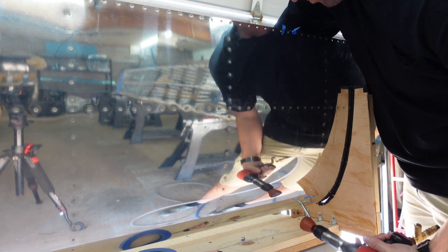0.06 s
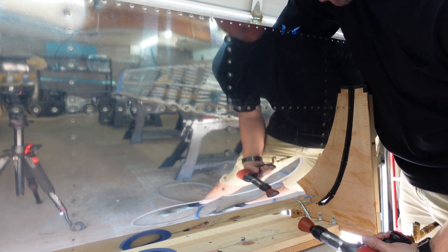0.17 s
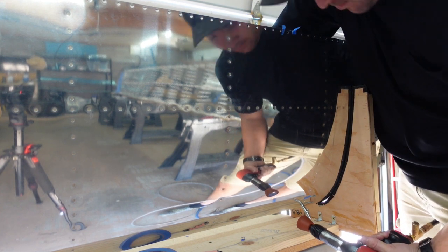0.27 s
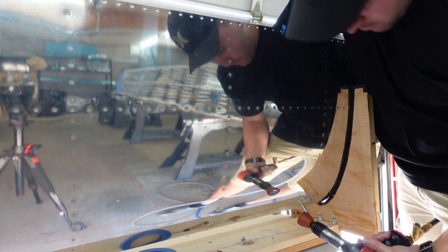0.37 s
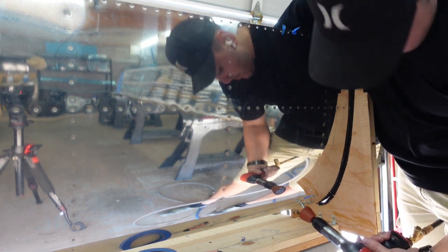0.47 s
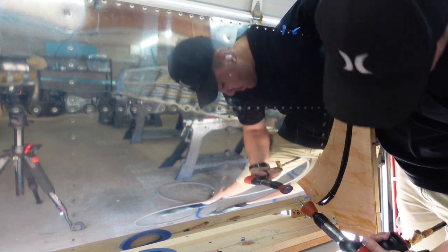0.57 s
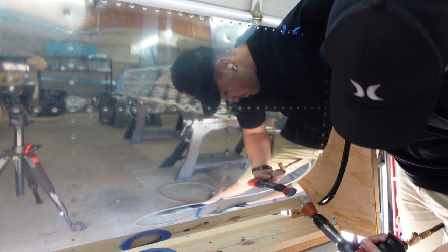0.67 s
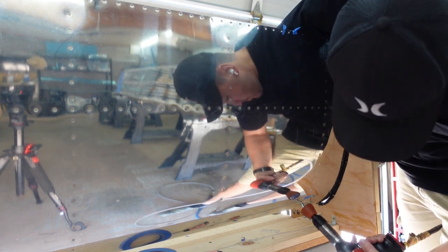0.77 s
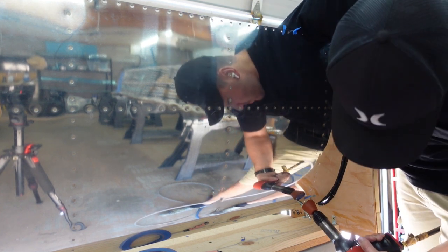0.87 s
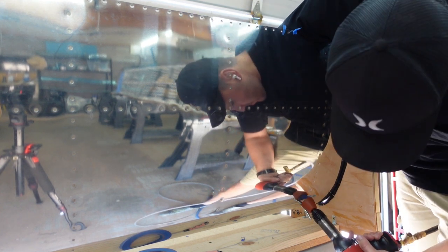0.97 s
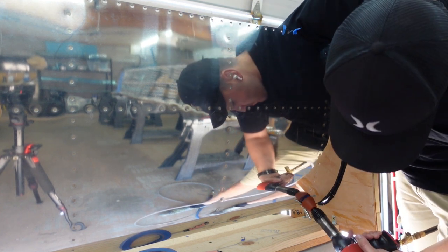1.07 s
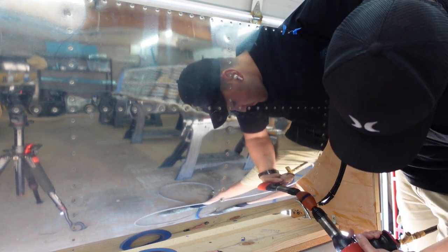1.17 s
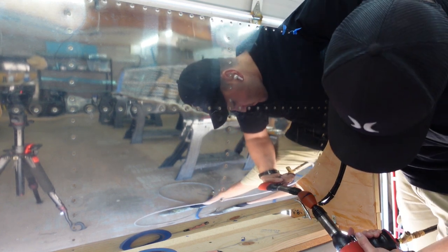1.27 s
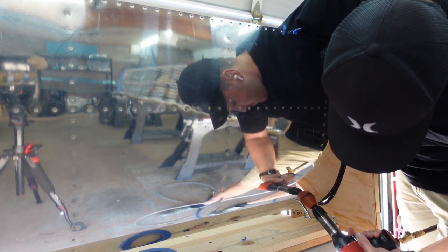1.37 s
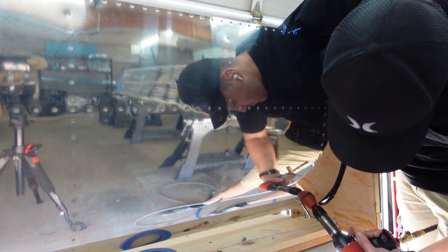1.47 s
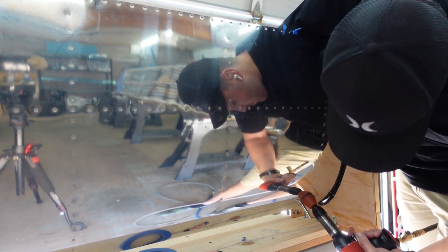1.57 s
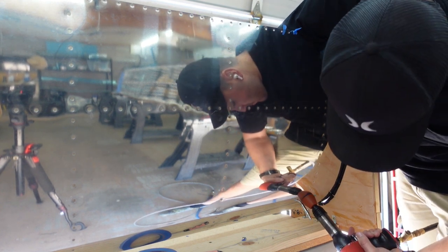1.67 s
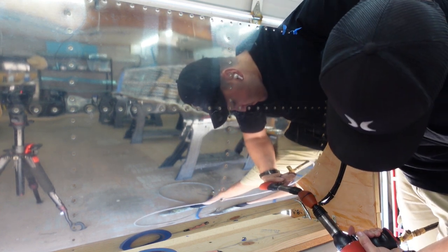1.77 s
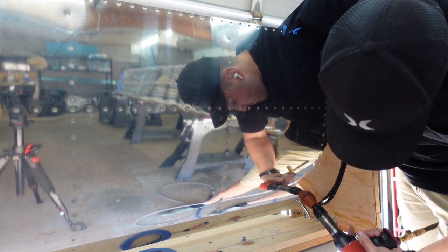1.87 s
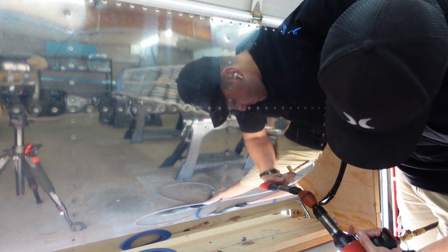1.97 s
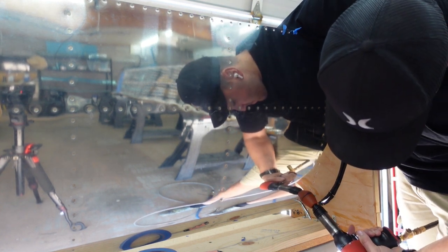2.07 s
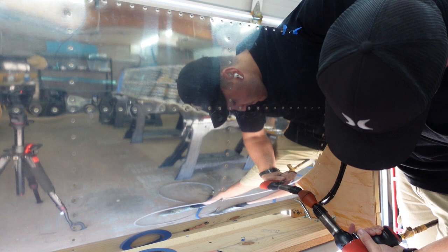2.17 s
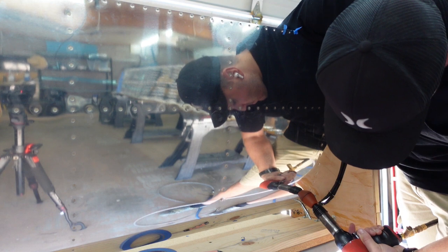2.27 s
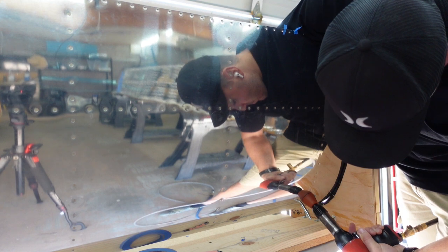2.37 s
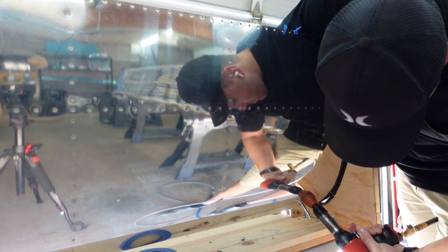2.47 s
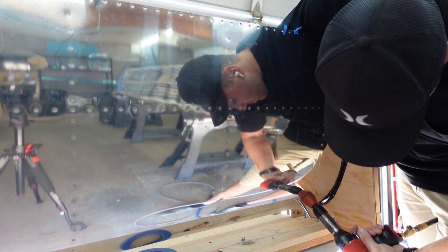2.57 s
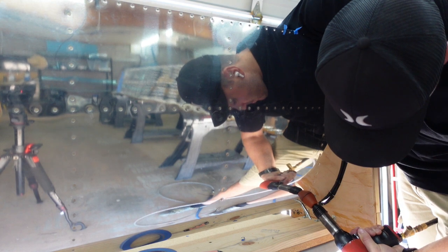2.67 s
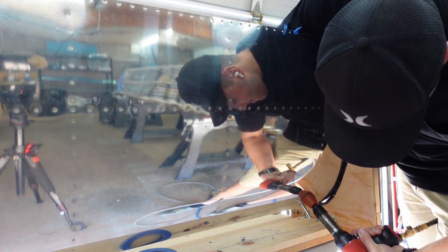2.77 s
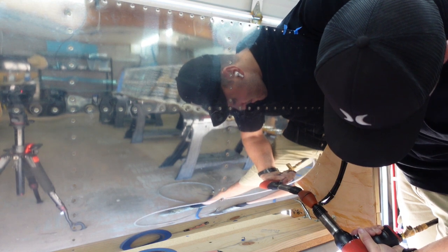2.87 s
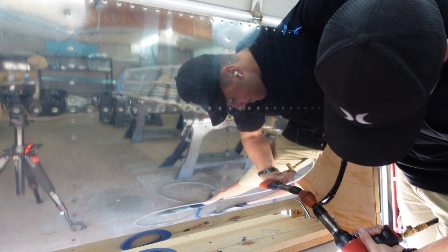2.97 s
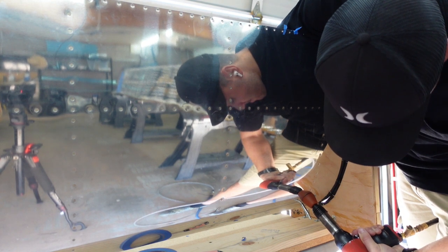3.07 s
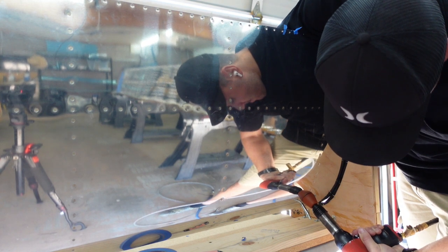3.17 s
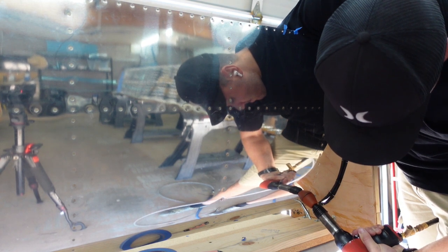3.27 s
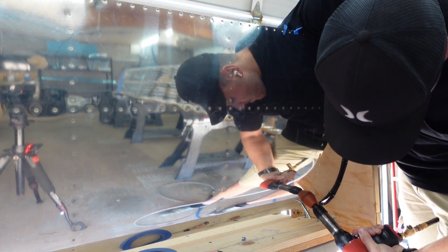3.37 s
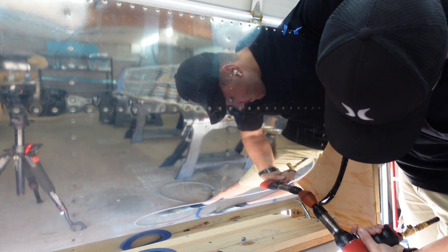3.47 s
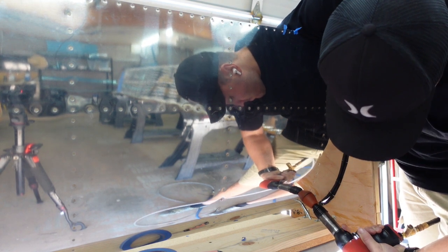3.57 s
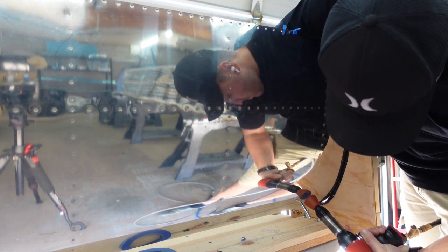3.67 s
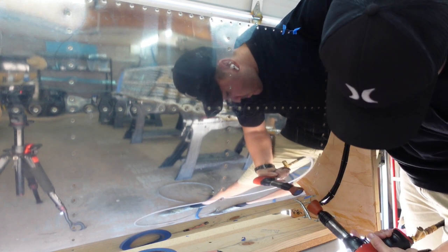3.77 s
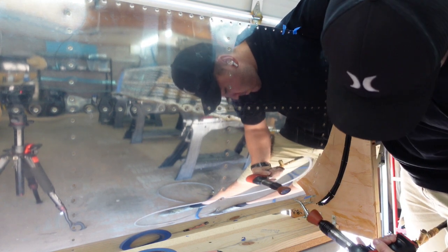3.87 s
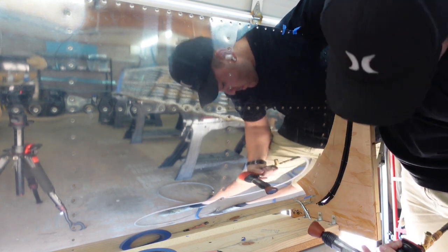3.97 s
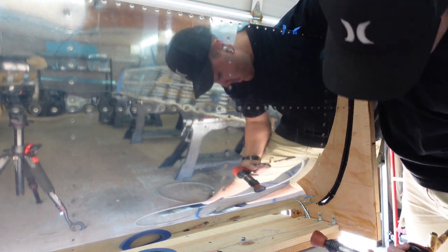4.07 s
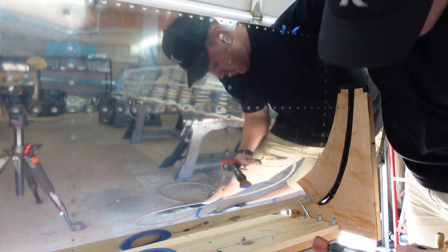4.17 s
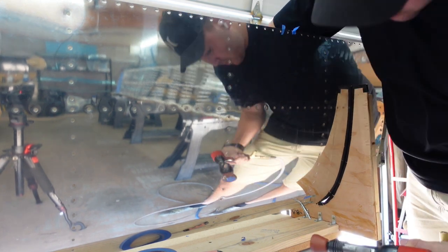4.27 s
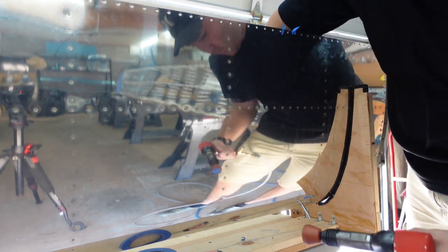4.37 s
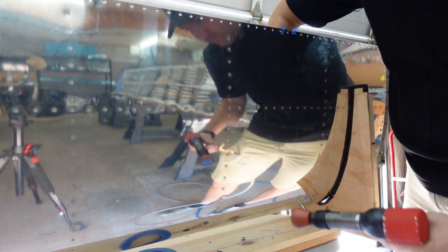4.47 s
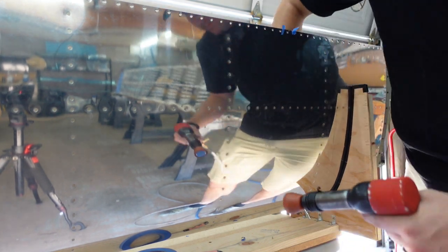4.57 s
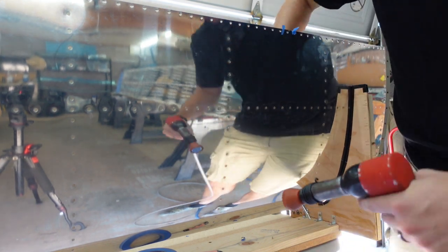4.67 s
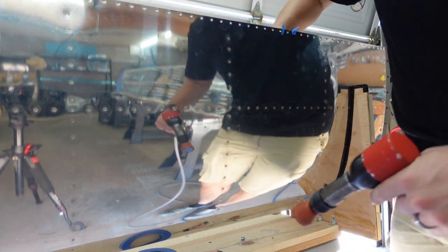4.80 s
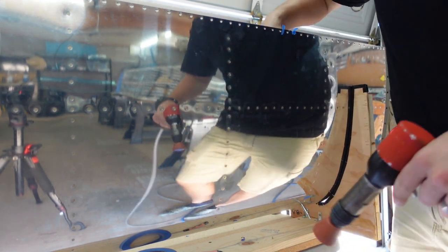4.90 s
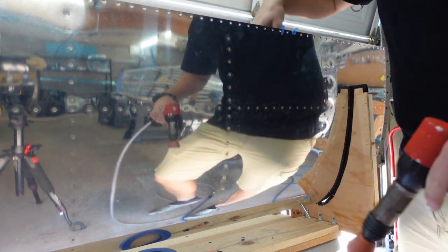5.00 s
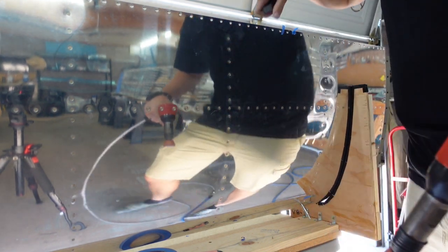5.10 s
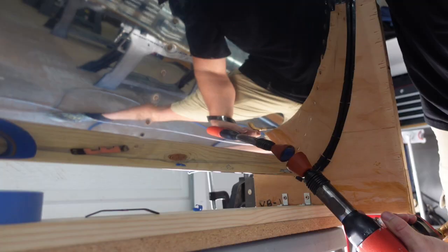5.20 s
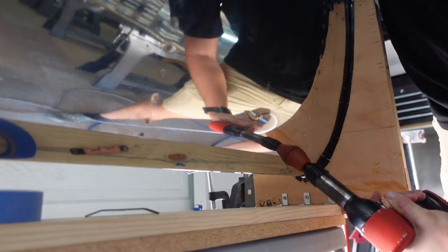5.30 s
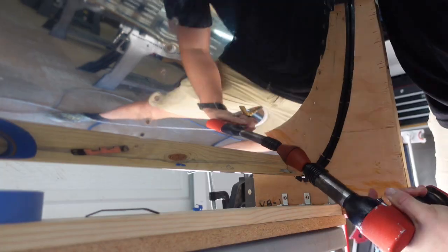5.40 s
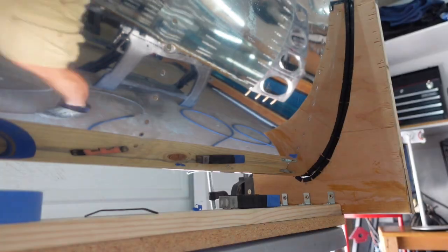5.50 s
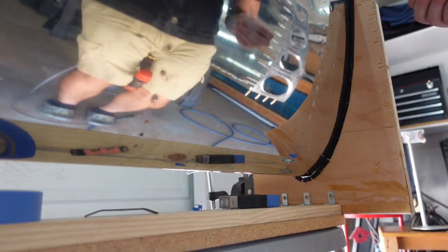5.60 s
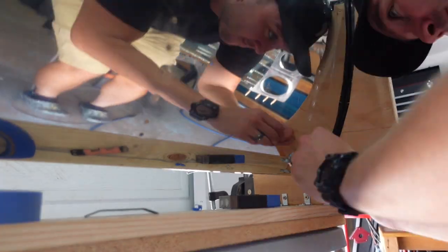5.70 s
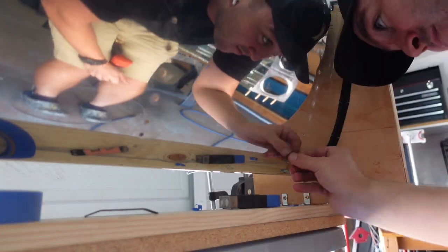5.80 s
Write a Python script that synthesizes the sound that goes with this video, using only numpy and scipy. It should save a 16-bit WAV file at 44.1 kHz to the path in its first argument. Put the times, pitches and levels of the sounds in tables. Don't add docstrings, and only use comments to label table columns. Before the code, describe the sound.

Steady workshop ventilation roar, a few tool ticks, then one rapid hammering burst from an air rivet gun on ringing sheet metal, ending in a low boom.

```python
import sys
import numpy as np
from scipy import signal
from scipy.io import wavfile

SR = 44100
rng = np.random.default_rng(int(sys.argv[2]) if len(sys.argv) > 2 else 0)


def dump_mix(stems):
    frames = np.atleast_2d(stems).T
    limited = np.clip(frames, -1, 1)
    pcm = np.round(limited * 32767).astype(np.int16)
    wavfile.write(sys.argv[1], SR, pcm)


def elevation(decibels):
    levels = np.asarray(decibels, float)
    return 10 ** (levels / 20)


N = 257764


def rms_one(x):
    return x / np.sqrt(np.mean(x ** 2) + 1e-20)


def at_hz(points, hz):
    table_hz, values = np.array(points).T
    return np.interp(np.log(hz), np.log(table_hz), values)


def resonance(x, hz, width_hz):
    r = np.exp(-np.pi * width_hz / SR)
    feedback = [1, -2 * r * np.cos(2 * np.pi * hz / SR), r * r]
    return signal.lfilter([(1 - r * r) / 2, 0, (r * r - 1) / 2], feedback, x)


def drift(rate_hz):
    r = np.exp(-80 * np.pi * rate_hz / SR)
    white = rng.standard_normal(N // 40 + 2002)
    slow = rms_one(signal.lfilter([1], [1, -2 * r, r * r], white)[2000:])
    return np.interp(np.arange(N) / 40, np.arange(len(slow)), slow)


EDGES = 33 * 2 ** np.arange(0, 9.3, .4)


def noise_bands(size, spectrum, side_table):
    settle = SR // 4
    white = rng.standard_normal((2, 2, size + settle))
    for k, (low, high) in enumerate(zip(EDGES, EDGES[1:])):
        sos = signal.butter(2, [low, high], "band", fs=SR, output="sos")
        mid, side = signal.sosfilt(sos, white[k % 2])[:, settle:]
        hz = np.sqrt(low * high)
        stereo = mid + elevation(at_hz(side_table, hz)) * side * [[1], [-1]]
        yield hz, elevation(at_hz(spectrum, hz)) * stereo


# (frequency [Hz], density [dB per Hz])
ROAR = [(15, -71), (25, -41.5), (49, -24), (175, -6.5), (212, -9), (317, -6), (363, -5.5), (405, -13),
        (439, -8.5), (560, -13.5), (677, -10), (1040, -14.5), (1440, -16.5), (7710, -33), (16000, -42.5)]
# (frequency [Hz], side over mid [dB])
ROAR_SIDE = [(60, -23), (180, -29.5), (550, -15.5), (1650, -12), (4970, -10), (15000, -9.5)]
# (frequency [Hz], left over right [dB])
ROAR_LEAN = [(60, 0.5), (180, -0.5), (550, 2), (1650, 2.5), (4970, 4), (15000, 1)]
# (frequency [Hz], width [Hz], level [dB rms])
HUMS = [(173.5, 20, -38), (291.3, 18, -40.5), (367.8, 7.3, -36.5), (686, 22, -40.5)]


def ventilation(patchy_db):
    together, roar = drift(1.9), 0
    for hz, band in noise_bands(N, ROAR, ROAR_SIDE):
        lean = elevation(at_hz(ROAR_LEAN, hz) * np.array([[.5], [-.5]]))
        flicker = elevation(patchy_db * (.5 * together + drift(5.1)))
        roar = roar + band * lean * flicker

    white, tones = rng.standard_normal(N), 0
    for hz, width_hz, db in HUMS:
        hum = resonance(resonance(white, hz, width_hz), hz, 4 * width_hz)
        tones = tones + elevation(db) * rms_one(hum)

    blade_hz = 367.2 + 1.2 * drift(2.5)
    blade_db = -30.5 + 2.4 * drift(1.9)
    tones = tones + elevation(blade_db) * np.sin(2 * np.pi * np.cumsum(blade_hz) / SR)
    return elevation(-24) * rms_one(roar) + tones * elevation(np.array([[.4], [-.4]]))


# (time [s], level [dB], rise [s], decay time T60 [s], lowest frequency [Hz])
PUFFS = [
    (.377, -32, .003, 0.43, 4000),
    (4.675, -36.5, .01, 0.63, 2200),
    (4.745, -41, .01, 0.47, 2500),
]


def puffs():
    t, out = np.arange(N) / SR, 0
    white = rng.standard_normal((2, N))
    for s, db, rise_s, t60, low_hz in PUFFS:
        decay = elevation(db - 60 * (t - s).clip(0) / t60)
        rise = ((t - s) / rise_s).clip(0, 1)
        sos = signal.butter(1, [low_hz, 11000], "band", fs=SR, output="sos")
        mid, side = signal.sosfilt(sos, white)
        out = out + decay * rise * rms_one(mid + 0.26 * side * [[1], [-1]])
    return out


# (time [s], peak level [dB], ring frequency [Hz], knock level [dB], knock frequency [Hz])
TICKS = [
    (2.731, -17.5, 11900, -22, 3630),
    (2.7866, -10, 11000, -16.5, 277),
    (2.8944, -9, 10400, -15, 475),
    (2.9166, -20.5, 9500, -8.5, 1044),
    (3.845, -22, 11700, -39, 400),
    (5.110, -23.5, 11930, -53, 397),
]


def ticks():
    out, t = np.zeros(N), np.arange(SR // 10) / SR
    for s, peak_db, ring_hz, knock_db, knock_hz in TICKS:
        spit = rng.standard_normal(len(t)) * np.exp(-t / 0.0016)
        high = resonance(spit, ring_hz, 1200) + .08 * spit
        cycles = knock_hz * t / 1.6
        knock = -np.sin(2 * np.pi * knock_hz * t) * cycles * np.exp(1 - cycles)
        tick = elevation(peak_db) * high / np.abs(high).max() + elevation(knock_db) * knock
        start = int(s * SR)
        out[start:start + len(t)] += tick
    return out


def clicks(times, levels_db):
    out = np.full(N, 1e-18)
    out[(np.asarray(times) * SR).astype(int)] = elevation(np.asarray(levels_db))
    return out


def crack(rows, decay_s, fresh, top_hz):
    t = np.arange(SR // 100) / SR
    sos = signal.butter(1, [900, top_hz], "band", fs=SR, output="sos")
    envelope = t / decay_s * np.exp(1 - t / decay_s)
    same, out = rng.standard_normal(len(t)), np.zeros(N)
    for s, crack_db, tail_db in rows:
        shape = (same + fresh * rng.standard_normal(len(t))) * envelope
        shape = signal.sosfilt(sos, shape)
        shape = shape + 1.8 * resonance(shape, 2600, 900)
        shape = shape + 1.5 * resonance(shape, 11400, 1500)
        start = int(s * SR)
        out[start:start + len(t)] += elevation(crack_db) * shape / np.abs(shape).max()
    return out


# (frequency [Hz], decay time T60 [s])
HALL_T60 = [(150, 0.61), (600, 1), (2000, 0.74), (6000, 0.6), (15000, .35)]
# (frequency [Hz], side over mid [dB])
GUN_SIDE = [(60, -12), (240, -25), (950, -19), (3770, -15.5), (15000, -14)]
# (frequency [Hz], level [dB])
FRESH = [(200, -16), (600, -10), (1500, -4), (5000, -2), (15000, 1)]


def tail(rows, spectrum, peaks, t60_share, onset_s):
    start, size = int(rows[0][0] * SR), int(1.4 * SR)
    hits = clicks([r[0] for r in rows], [r[2] for r in rows])[start:start + size]
    t, pattern, new = np.arange(size) / SR, 0, 0
    for hz, band in noise_bands(size, spectrum, GUN_SIDE):
        t60 = t60_share * at_hz(HALL_T60, hz)
        onset = 1 - np.exp(-(t / onset_s) ** 2)
        decay = elevation(-60 * t / t60) * onset / np.sqrt(t60)
        pattern = pattern + band * decay
        power = signal.fftconvolve(hits ** 2, decay ** 2)[:size]
        unrelated = band[:, ::-1]
        new = new + elevation(at_hz(FRESH, hz)) * unrelated * np.sqrt(np.abs(power))
    wet = signal.fftconvolve(hits[None], pattern, axes=1)[:, :size] + new
    wet = wet + sum((elevation(db) - 1) * resonance(wet, hz, width_hz) for hz, width_hz, db in peaks)
    out = np.zeros((2, N))
    out[:, start:start + size] = wet / np.sqrt(np.mean(pattern[:, :SR // 10] ** 2))
    return out


# (time [s], crack peak [dB], tail level [dB])
FIRST_BLOW = [
    (2.7862, -16, -37),
    (2.8137, -3, -26),
    (2.8932, -10, -34.5),
    (2.9112, -4, -19.5),
]
# (frequency [Hz], density [dB per Hz])
FIRST_TAIL = [(500, -27), (1000, -1.5), (2000, -5.5), (5000, -8), (8000, -15.5), (11000, -16),
              (13000, -25.5), (17000, -26.5)]
# (frequency [Hz], width [Hz], height [dB])
VALVE_PEAKS = [(3540, 810, 5.5), (9950, 590, 9.5), (11000, 870, 8)]


def first_blow():
    cracks = crack(FIRST_BLOW, decay_s=0.00052, fresh=0.74, top_hz=4000)
    return cracks + tail(FIRST_BLOW, FIRST_TAIL, VALVE_PEAKS, t60_share=0.96, onset_s=0.0058)


BURST_S = 2.9110


def piston():
    blows = 15
    k = np.arange(blows)
    eased = (k - 7).clip(0)
    filling_s = .0197 * np.exp(-(k / 1.12) ** 1.32)
    last_lag_s = .0064 * (k == blows - 2)
    period_s = .04005 + filling_s + .00029 * eased + last_lag_s
    times = BURST_S + np.cumsum(period_s) - period_s
    crack_db = -2.5 - 6.5 * np.exp(-k / 1.4)
    tail_db = -13 - 4.5 * np.exp(-k / 3.5) - 0.12 * eased
    return np.column_stack([times, crack_db, tail_db])


def ring(x, hz, t60):
    r, w = elevation(-60 / (t60 * SR)), 2 * np.pi * hz / SR
    return signal.lfilter([0, np.sin(w)], [1, -2 * r * np.cos(w), r * r], x)


# (frequency [Hz], density [dB per Hz])
TAIL = [(60, -41.5), (110, -33), (200, -7), (330, -12), (480, -1.5), (800, -10), (1400, -12), (2100, -10.5),
        (3500, -14), (5000, -9), (8000, -13.5), (12000, -19), (17000, -23.5)]
# (frequency [Hz], width [Hz], height [dB])
PANEL_PEAKS = [(1039, 200, 4.5), (2620, 200, 4), (4200, 140, 5), (5160, 310, 0.5), (5890, 500, 1.5),
               (7300, 230, 3), (9690, 700, 6), (11200, 420, 0), (13140, 370, -9)]
# (frequency [Hz], level [dB], decay time T60 [s])
PANEL_MODES = [(196, -26.5, 0.38), (231, -29, 0.34), (270, -31.5, 0.34), (345, -29.5, 0.26),
               (420, -21.5, 0.3), (437, -21.5, .35), (519, -24, 0.26), (567, -28.5, 0.54), (650, -33, 0.25)]


def burst():
    blows = piston()
    wet = tail(blows, TAIL, PANEL_PEAKS, t60_share=1.0, onset_s=0.0095)
    push = resonance(clicks(blows[:, 0], blows[:, 2] + 19.7), 310, 700)
    modes = 0
    for k, (hz, db, t60) in enumerate(PANEL_MODES):
        modes = modes + (-1) ** k * elevation(db) * ring(push, hz, t60)
    cracks = elevation(9.0) * crack(blows, decay_s=.00045, fresh=.7, top_hz=14000)
    return wet + modes + cracks


def rumble():
    top_s, spread_s = 3.62, .07
    bell = np.exp(-.5 * ((np.arange(N) / SR - top_s) / spread_s) ** 2)
    return elevation(-25) * bell * rms_one(resonance(rng.standard_normal(N), 480, 600))


# (top time [s], frequency [Hz], level [dB rms], swell [s], fade [s])
BOOM = [
    (3.69, 170.5, -19.5, 0.027, 0.084),
    (3.67, 195.7, -17, 0.18, 0.062),
    (3.6, 220, -24, .09, 0.19),
    (3.74, 260, -28, 0.098, 0.029),
    (3.93, 169, -24, 0.041, 0.031),
    (4.06, 175, -34.5, .03, .04),
]


def boom():
    t, out, beat_top_s = np.arange(N) / SR, 0, 3.708
    for s, hz, db, swell_s, fade_s in BOOM:
        bell = np.exp(-.5 * ((t - s) / np.where(t < s, swell_s, fade_s)) ** 2)
        out = out + np.sqrt(2) * elevation(db) * bell * np.cos(2 * np.pi * hz * (t - beat_top_s))
    return out


def scene():
    background = ventilation(patchy_db=0.79) + puffs()
    return background + ticks() + first_blow() + burst() + rumble() + boom()


def gain_control(x):
    t = np.arange(N) / SR
    release_at_s, release_s, settle_s = 3.508, 0.15, 0.086

    def ramp(start, length):
        return ((t - start) / length).clip(0, 1)

    duck_db = 5 * ramp(BURST_S, .012) + 4.5 * ramp(BURST_S, .3)
    back = ramp(release_at_s, release_s)
    overshoot_db = 2 * (back - ramp(release_at_s + release_s, settle_s))
    return x * elevation(-0.32 - duck_db * (1 - back) + overshoot_db)


def roll_off(x):
    return signal.sosfilt(signal.butter(12, 16690, fs=SR, output="sos"), x)


def record(dry):
    t, cut_s = np.arange(N) / SR, 5.2195
    x = gain_control(dry)
    x = .95 * np.tanh(x / .95)
    x = signal.sosfilt(signal.ellip(10, .3, 55, 15720, fs=SR, output="sos"), x)
    x = signal.sosfilt(signal.butter(3, 45, "high", fs=SR, output="sos"), x)
    x = x * ((cut_s - t) / .001).clip(0, 1)
    return roll_off(x)


dry = scene()
out = record(dry)
dump_mix(out)
```